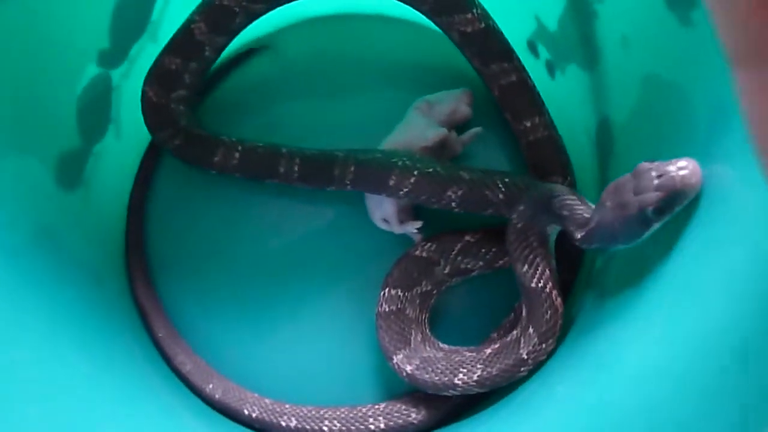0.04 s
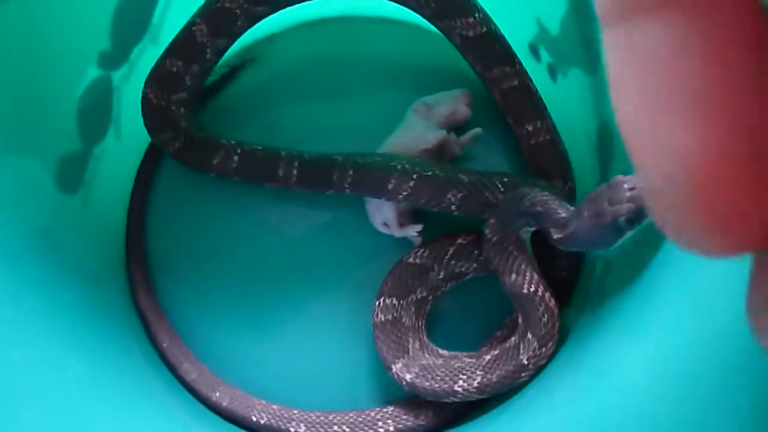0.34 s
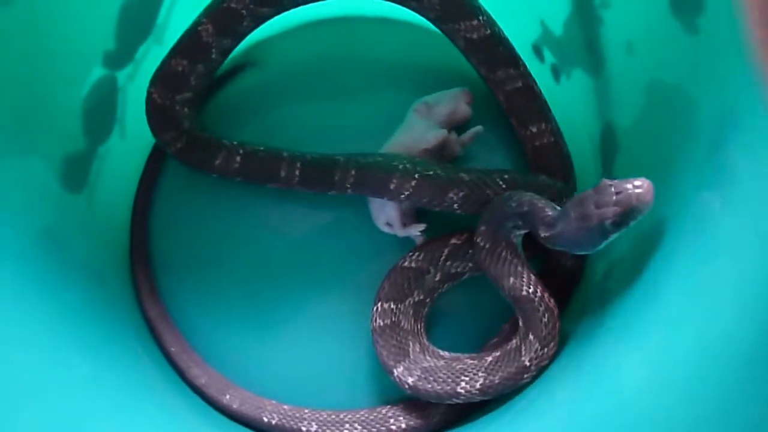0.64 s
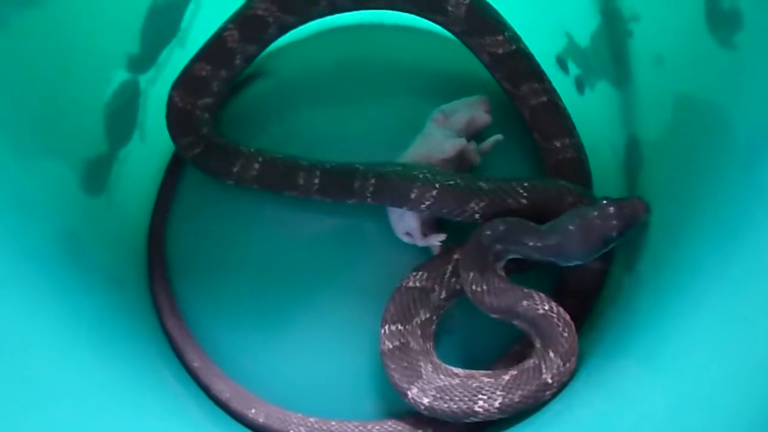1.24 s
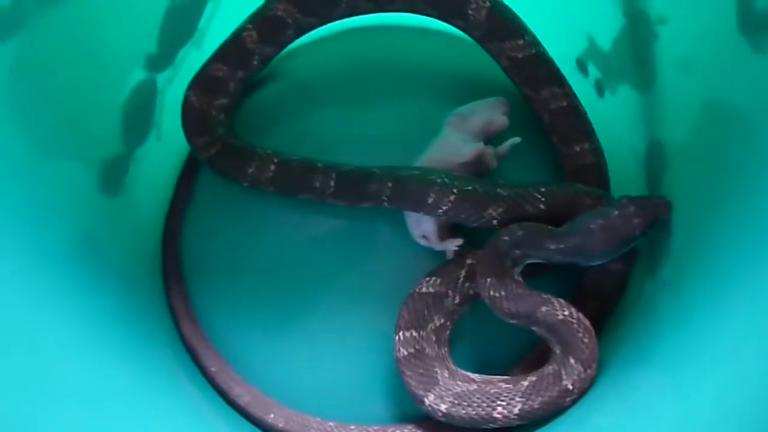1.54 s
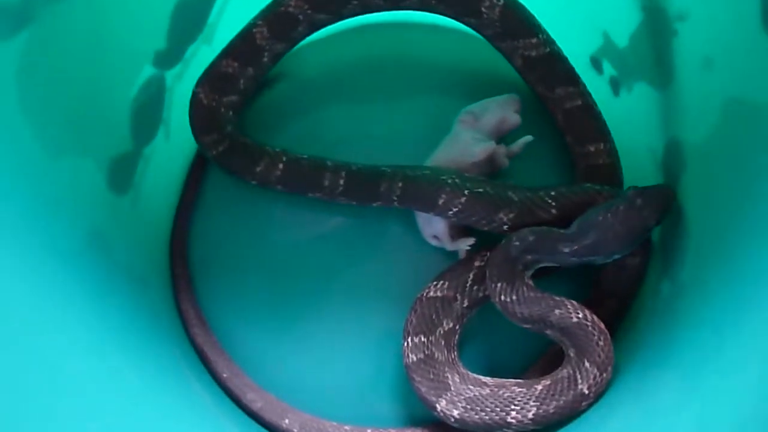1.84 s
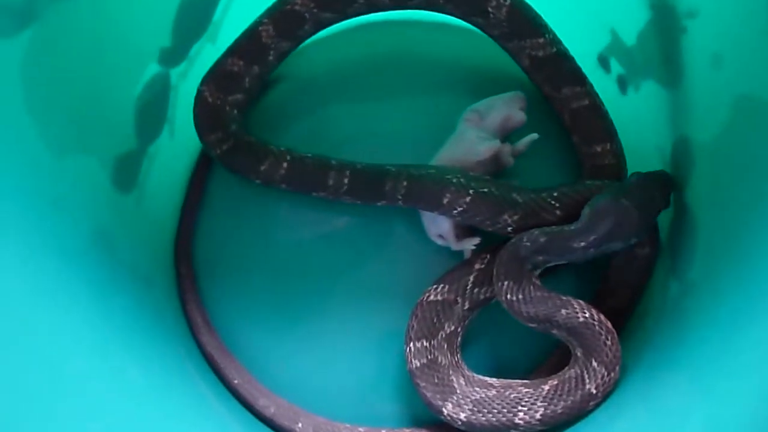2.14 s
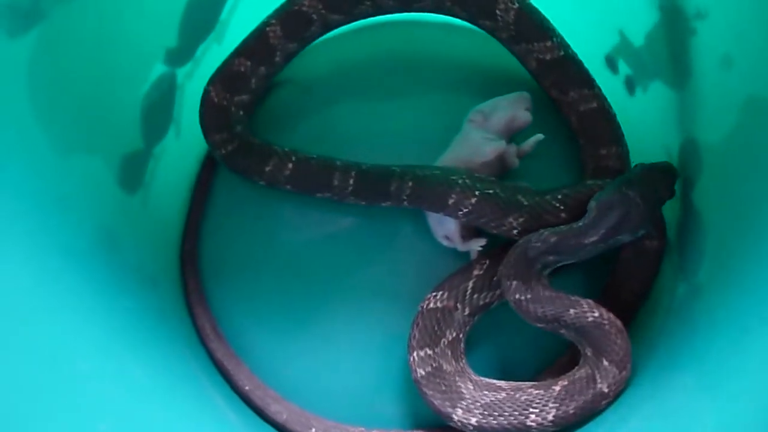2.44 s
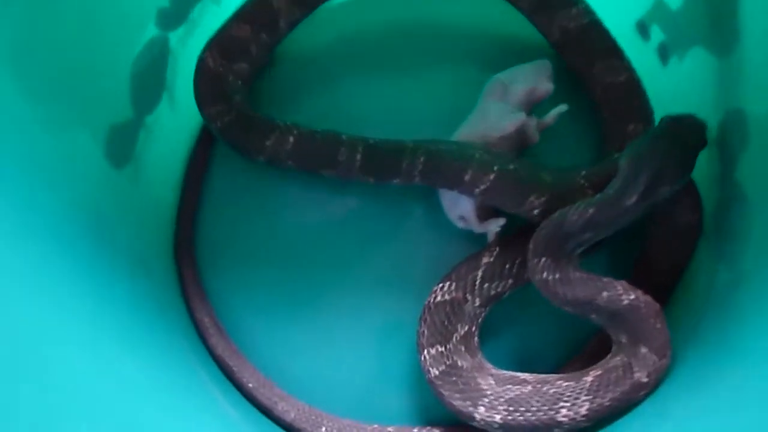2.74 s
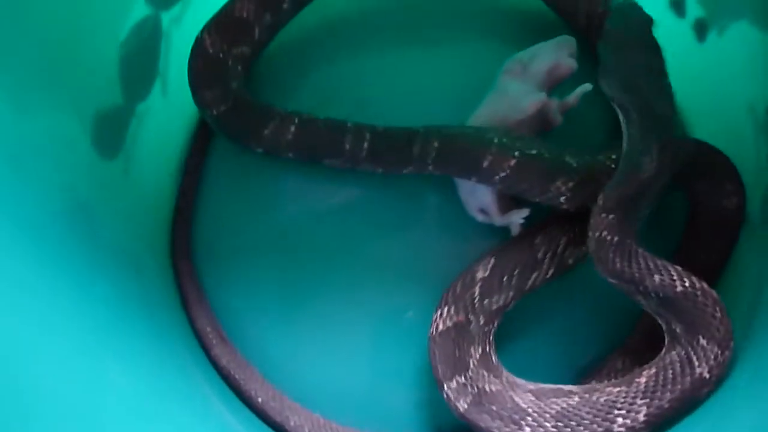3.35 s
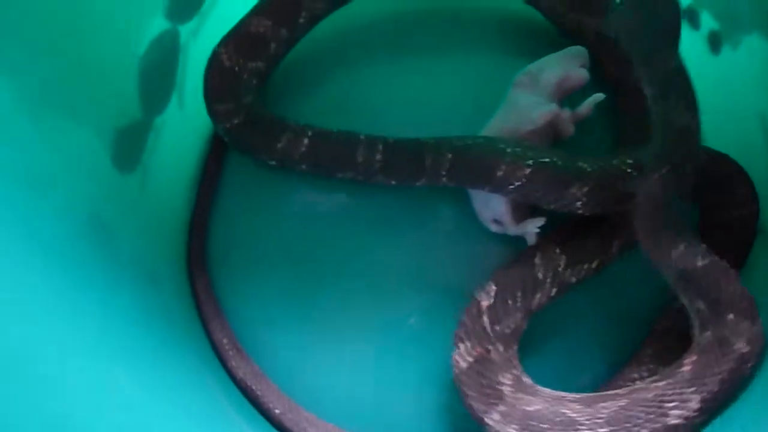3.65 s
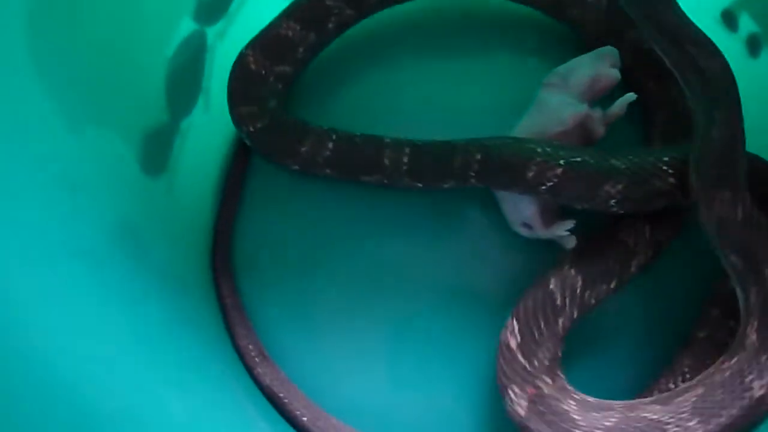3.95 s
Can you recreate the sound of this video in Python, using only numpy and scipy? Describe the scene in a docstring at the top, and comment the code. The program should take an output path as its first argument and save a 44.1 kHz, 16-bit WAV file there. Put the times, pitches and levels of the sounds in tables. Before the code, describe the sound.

A snake's tail rattles against a plastic tub, close by in a quiet room. After a brief burst and a pause comes a fast buzz of ticks, hollow knocks and scraping, which turns raspier and stops, leaving soft hiss.

```python
"""A snake buzzes its tail in a plastic tub, close by, in a quiet room with a mains hum.
A short burst and a pause come first; then the tail beats for three seconds, about 40 times a second.
On each beat the tip ticks on the wall and rebounds, and the flesh thumps the tub into resonance;
between beats the scales scrape to and fro. The tone changes as the tail shifts to new spots, and
a bright rasp joins in its last second. When the tail stops, a soft hiss swells."""
import sys
import numpy as np
from scipy import signal
from scipy.fft import rfft, irfft
from scipy.io import wavfile

SR = 44100
rng = np.random.default_rng(int(sys.argv[2]) if len(sys.argv) > 2 else 0)


def wav_record(signal):
    """Record a signal, one row per channel, as 16-bit PCM in the file named by sys.argv[1]."""
    frames = np.transpose(np.atleast_2d(signal))
    bounded = np.clip(frames, -1, 1)
    # unit amplitude maps onto the largest positive 16-bit level
    quanta = np.round(bounded * 32767).astype(np.int16)
    wavfile.write(sys.argv[1], SR, quanta)


N = 176400
TOP_HZ = 15550

# strength of the ordinary beats (time [s], tick level [dB], thump level [dB])
BEAT_LEVELS = [(.4, -13, -22), (.54, -13, -21), (.62, -12, -19), (.75, -11.5, -20), (.95, -11, -20),
               (1.05, -12.5, -20), (1.22, -13, -17), (1.5, -10.5, -19), (1.85, -14.5, -18), (2.1, -15, -18),
               (2.45, -12, -17), (2.75, -13, -15), (3.28, -12, -16)]
# hollow knocks on the wall (time [s], ring level [dB], pitch [Hz], slap level [dB])
WALL_KNOCKS = [(.008, -20, 580, -26), (.3815, -18, 560, -24), (.4724, -14, 550, -20),
               (.4971, -12.5, 550, -18), (.5222, -16, 560, -13), (.5439, -14, 540, -26),
               (.5878, -15, 550, -25), (.665, -18, 600, -7), (.6781, -17, 580, -24),
               (1.1963, -17, 550, -30), (1.2446, -16, 580, -30), (1.6997, -16, 560, -30),
               (1.7729, -16, 550, -30), (1.9691, -16, 590, -30), (2.0096, -17, 540, -24),
               (2.4165, -15, 660, -30), (2.6441, -15, 570, -30), (2.7721, -15, 540, -30),
               (2.994, -15, 550, -30), (3.0568, -15, 540, -30), (3.1403, -17, 500, -19)]
# modes of the tub, the second the strongest (frequency [Hz], level [dB])
TUB_MODES = [(525, 1), (580, 8.5), (680, -1), (1370, -2)]


def ticks(t, beats, rebound_s=.0037, treble_hz=8000):
    """Inelastic impact: the tip strikes the wall, loses energy and rebounds more weakly."""
    # hard strikes of the tip (time [s], level [dB], extra treble [dB])
    strikes = [(0.0072, -14.0, 8), (0.036, -12.5, 2), (0.3478, -5.5, -4), (0.3621, -12, -1),
               (0.427, -0.5, 2), (0.4508, -7.5, -2), (0.589, -11, 5), (0.6562, -6, 2), (0.8198, -7.5, 0),
               (0.8434, -8.0, 1), (0.9845, -8, 1), (1.0078, -9.5, 3), (1.102, -8, 1), (1.1488, -8.5, 0),
               (1.3614, -7.0, -1), (1.3861, -9.0, 2), (1.434, -9, 1), (1.5286, -5.5, -2), (1.601, -9, 1),
               (1.6743, -7.5, 0), (1.7482, -7.5, 4), (1.8202, -7.5, 1), (2.214, -9.0, 6),
               (2.3908, -5.5, -1), (2.4914, -8.5, 0), (2.5409, -7.0, 3), (2.5663, -2.5, -3),
               (2.7206, -7.5, 0), (2.798, -1.5, -4), (2.8505, -7.0, 0), (2.9513, -8.5, 3), (2.977, -8.0, 4),
               (3.0031, -8.0, 4), (3.056, -9.5, 4), (3.1061, -3.5, 1), (3.1566, -2.0, 4), (3.2086, -5.0, 0)]
    hard_s, hard_db, hard_treble_db = np.array(strikes).T
    soft_s = beats_apart(beats, hard_s)
    times = np.r_[hard_s, soft_s]
    force, lag, size = np.clip(rng.standard_normal((len(times), 3)).T, -1.5, 1.5)
    db = np.r_[hard_db, curve(BEAT_LEVELS, soft_s) + 1.9 * force[len(hard_s):]]
    treble_db = np.r_[hard_treble_db, np.zeros(len(soft_s))]
    rebound_db = np.minimum(db, curve(BEAT_LEVELS, times)) - 10 + 4 * size
    rebounds = impulses(times + rebound_s * (1 + .1 * lag), rebound_db)
    body = wall(t, impulses(times, db) + rebounds)
    snap = wall(t, impulses(times, db + treble_db) + rebounds)
    crossover = signal.butter(2, treble_hz, fs=SR, output="sos")
    return snap + signal.sosfiltfilt(crossover, body - snap)  # zero phase: body below, snap above


def wall(t, hits):
    """Modal excitation: the spot that is struck sets which resonances of the wall sound."""
    # spectrum of a tick on each of four spots (frequency [Hz], level [dB])
    opening = [(400, -12), (1000, -9), (1350, 1), (1600, -7), (2000, 3), (2600, -11), (3300, -4),
               (3800, -14), (4300, 2), (5000, 2.5), (5500, -8), (6800, 6), (7600, -3), (8100, 3),
               (10000, 0), (11300, -8), (12300, 0), (13700, 4), (15500, -9)]
    first = [(400, -10), (650, -5), (1000, -11), (1400, -6), (2000, -9), (2900, -6), (3800, -13),
             (4600, -7), (5500, -14), (6800, -2), (7600, -9), (8100, -2), (10500, -8), (12300, -4),
             (13700, 5.5), (15500, -9)]
    second = [(400, -12), (1650, -13), (2200, 2), (2850, 3), (3400, -3), (3900, -10), (4600, -5),
              (5600, -9), (7100, 3), (8400, -7), (12000, -9), (13200, 4), (14000, 4.5), (15500, -14)]
    third = [(400, -9), (1650, -9), (2100, 3), (3100, 4.5), (3800, -7), (4550, 4), (5050, 0), (6000, 2),
             (9200, -7), (10900, 6), (12400, -1), (13000, 5), (13500, -2), (15500, -7)]
    # share of power as the tail shifts (time [s], opening [0-1], first [0-1], second [0-1], third [0-1])
    shares = [(.46, 1, 0, 0, 0), (.6, 0, 1, 0, 0), (.85, 0, 1, 0, 0), (1.15, 0, 0, 1, 0), (2.3, 0, 0, 1, 0),
              (2.6, 0, 0, 0, 1)]
    crack_gain = undb(-4)
    contact = (hits + crack_gain * crackle(hits, decay_s=.0009)) / np.hypot(1, crack_gain)
    spots = (colour(contact * np.sqrt(curve(shares, t, column)), spectrum)
             for column, spectrum in enumerate((opening, first, second, third), start=1))
    return highpass(sum(spots), hz=494)


def thumps(beats, lag_s=.00066, backswing_s=.015, detune=.03):
    """Impulse excitation: the fleshy tail pushes the tub on each beat, and lightly on the backswing."""
    beats = beats_apart(beats, np.array(WALL_KNOCKS)[:, 0])
    scatter = np.clip(rng.standard_normal((len(beats), 6)).T, -2, 2)
    lag, size, pitch, back_lag, back_size, back_pitch = scatter
    db = curve(BEAT_LEVELS, beats, column=2) - 5
    forward = tub(beats + lag_s + .00061 * lag, db + 2.5 * size, 1 + detune * pitch)
    back = tub(beats + backswing_s + .00199 * back_lag, db - 7 + 3 * back_size, 1 + detune * back_pitch)
    return forward + back


def knocks():
    """Transient and free vibration: a heavier knock gives a dry slap and rings the tub."""
    # spectrum of the slap (frequency [Hz], level [dB])
    spectrum = [(200, -25), (550, -2), (900, 1), (1350, 10), (1900, 8), (2600, -2), (6000, -3),
                (15000, -12)]
    times, ring_db, hz, slap_db = np.array(WALL_KNOCKS).T
    slaps = crackle(impulses(times, slap_db), decay_s=.0012)
    return tub(times, ring_db, hz / TUB_MODES[1][0]) + colour(slaps, spectrum)


def tub(times, db, pitch_ratios):
    """Superposition: each push adds one ring, whose pitch depends on where the tail lands."""
    out = np.zeros(N + SR)
    for onset_s, gain, ratio in zip(times, undb(db), pitch_ratios):
        response, start = ring(ratio), max(int(onset_s * SR), 0)
        out[start:start + len(response)] += gain * response
    return out[:N]


def ring(pitch_ratio=1, t60_s=.03, cutoff_hz=420):
    """Damped resonance: the tub rings briefly in its low modes and radiates little below them."""
    t = np.arange(SR // 8) / SR
    modes = sum(undb(db) * np.sin(2 * np.pi * hz * pitch_ratio * t) for hz, db in TUB_MODES)
    damped = modes * undb(-60 * t / t60_s)
    return unit(highpass(highpass(damped, cutoff_hz), cutoff_hz))


def scrape(t, cycles, swing_db=2, turn_db=.8, flutter_db=1.7):
    """Sliding friction: scales cross the plastic in fine, uneven grains, out and back on each beat."""
    # spectra under light and hard pressure (frequency [Hz], level [dB])
    light_spectrum = [(300, -17), (900, 2), (1400, 7.5), (1900, 7.5), (2900, 4), (4000, 3), (5800, 3.5),
                      (7400, -2.5), (9500, 6.5), (10500, 4), (13100, 6), (14500, 4.5), (15600, -2)]
    hard_spectrum = [(300, -5.5), (600, -1), (1000, -1), (1650, -1.5), (2400, 2), (3000, -4), (4000, 3.5),
                     (4550, 0), (5250, 0.5), (5800, 3.5), (6800, -3.5), (8000, -3), (10000, -1.5),
                     (11000, 0.5), (13500, 0.5), (15600, 0)]
    # envelopes under light and hard pressure (time [s], level [dB])
    light_levels = [(0, -46), (.06, -45), (.11, -52), (.14, -84), (.315, -67), (.328, -58), (.342, -57),
                    (.365, -45), (.65, -43.5), (1.1, -43.5), (1.7, -43.5), (2.1, -42.5), (2.6, -47.5),
                    (3.29, -52), (3.33, -75)]
    hard_levels = [(.3, -64.5), (1.2, -55), (1.7, -46), (2.05, -41.5), (2.4, -41.5), (2.62, -41),
                   (2.95, -37.5), (3.15, -40.5), (3.295, -38.5), (3.32, -55), (3.4, -88)]
    grains = rng.standard_normal((2, N)) * undb(3 * np.minimum(rng.exponential(size=(2, N)), 5))
    angle = 2 * np.pi * (cycles - .65)
    stroke_db = swing_db * np.cos(angle) + turn_db * np.cos(2 * angle)
    grains = grains / grains.std() * undb(stroke_db + flutter_db * wander(rate_hz=170))
    light = grains[0] * undb(curve(light_levels, t))
    hard = grains[1] * undb(curve(hard_levels, t))
    resonance = undb(-16) * through(light + hard, ring())
    return colour(light, light_spectrum) + colour(hard, hard_spectrum) + resonance


def rasp(t, centre_hz=4500, width_hz=400):
    """Narrow-band friction noise: pressed hard, the scales rasp around a wandering frequency."""
    # envelope of the rasp (time [s], level [dB])
    levels = [(2.1, -70), (2.5, -51), (2.75, -46.5), (3.0, -45.5), (3.28, -45), (3.33, -90)]
    lowpass = signal.butter(2, width_hz / 2, fs=SR, output="sos")
    in_phase, quadrature = signal.sosfilt(lowpass, rng.standard_normal((2, N)))
    angle = 2 * np.pi * np.cumsum(centre_hz * (1 + .02 * wander(rate_hz=35))) / SR
    band = in_phase * np.cos(angle) + quadrature * np.sin(angle)
    return band / in_phase.std() * undb(curve(levels, t))


def rumble(t):
    """Forced vibration: the shaken tub gives off low noise."""
    # spectrum of the rumble (frequency [Hz], level [dB])
    spectrum = [(25, -6.5), (65, -5.5), (230, -1.5), (400, -11), (900, -26), (3000, -51)]
    # its envelope (time [s], level [dB])
    levels = [(0, -58), (.12, -67), (.2, -67), (.5, -58.5), (1.5, -63.5), (2.4, -59), (3.25, -57.5),
              (3.35, -64)]
    return colour(rng.standard_normal(N), spectrum) * undb(curve(levels, t))


def background(t, hum_hz=120):
    """Incoherent sources add: steady room noise, mains hum and a late swell of hiss."""
    # spectra of the room noise and the hiss (frequency [Hz], level [dB])
    room_spectrum = [(20, -59), (45, -34), (90, -0.5), (150, 9), (200, 3.5), (350, 4), (540, 4.5),
                     (800, -5.5), (1400, -3), (4000, -14.5), (9000, -29), (15000, -63)]
    hiss_spectrum = [(40, -20), (130, -16.5), (350, -3), (570, -1), (850, -5.5), (2000, -11.5),
                     (6000, -17.5), (15000, -20.5)]
    # envelope of the hiss (time [s], level [dB])
    hiss_levels = [(3.25, -85), (3.35, -58.5), (3.55, -59), (3.85, -56.5), (3.9, -53), (4, -52)]
    hum = undb(-69.5) * np.sqrt(2) * np.sin(2 * np.pi * hum_hz * t)
    hiss = colour(rng.standard_normal(N), hiss_spectrum) * undb(curve(hiss_levels, t))
    return undb(-58.5) * colour(rng.standard_normal(N), room_spectrum) + hum + hiss


def beats_apart(beats, times, gap_s=.01):
    """The beats that coincide with none of the given times."""
    return beats[np.abs(beats[:, None] - times).min(axis=1) > gap_s]


def impulses(times, db):
    """Ideal impacts: one impulse for each contact."""
    out = np.zeros(N)
    np.add.at(out, np.clip((times * SR).astype(int), 0, N - 1), undb(db))
    return out


def crackle(hits, decay_s):
    """Contact noise: a short, decaying puff after each impulse."""
    decay = unit(np.exp(-np.arange(SR // 20) / SR / decay_s))
    return through(hits, decay) * rng.standard_normal(N)


def reflections(decay_s):
    """Diffuse reflection: exponentially decaying noise of unit energy."""
    t = np.arange(SR // 4) / SR
    return unit(rng.standard_normal(len(t)) * np.exp(-t / decay_s))


def wander(rate_hz):
    """Smooth random modulation with a spread near 1."""
    steps = rng.standard_normal(int(rate_hz * N / SR) + 2)
    return 1.2 * np.interp(np.arange(N) * rate_hz / SR, np.arange(len(steps)), steps)


def colour(x, spectrum, size=4096):
    """Minimum-phase filtering at unit energy, from points of (frequency [Hz], level [dB])."""
    hz, db = np.array(spectrum, float).T
    f = np.maximum(np.fft.rfftfreq(size, 1 / SR), 1)
    gain = undb(np.interp(np.log(f), np.log(hz), db)) / (1 + (f / TOP_HZ) ** 40)
    cepstrum = irfft(np.log(gain + 1e-5))
    cepstrum[1:size // 2] *= 2  # folding the cepstrum makes the response causal
    cepstrum[size // 2 + 1:] = 0
    response = irfft(np.exp(rfft(cepstrum)))
    return through(x, unit(response))


def highpass(x, hz):
    """Second-order roll-off of the bass."""
    return signal.sosfilt(signal.butter(2, hz, "high", fs=SR, output="sos"), x)


def through(x, response):
    """Convolution with an impulse response."""
    return signal.fftconvolve(x, response)[:N]


def unit(response):
    """Normalisation to unit energy."""
    return response / np.sqrt(np.sum(response ** 2))


def curve(table, t, column=1):
    """Linear interpolation of one column of a table at times t."""
    rows = np.array(table, float)
    return np.interp(t, rows[:, 0], rows[:, column])


def undb(db):
    """Decibels to amplitude ratio."""
    return 10 ** (np.asarray(db) / 20)


def scene(start_s=.4036, stop_s=3.29, walls_s=.002, room_s=.11):
    """Direct sound and reflections: the tail beats, tub and room answer; the two channels differ only faintly."""
    # beat rate of the tail (time [s], rate [Hz])
    beat_rate = [(0.4, 40.97), (0.56, 44.44), (0.8, 42.55), (1.15, 42.54), (1.45, 41.83), (1.75, 40.99),
                 (2.1, 40.29), (2.35, 40.05), (2.7, 38.9), (3.0, 38.75), (3.15, 39.69), (3.3, 33.49)]
    t = np.arange(N) / SR
    cycles = np.cumsum(curve(beat_rate, t)) / SR
    cycles -= np.interp(start_s, t, cycles)
    whole_cycles = np.arange(np.interp(stop_s, t, cycles))
    beats = np.interp(whole_cycles, cycles, t)
    tail = rumble(t) + ticks(t, beats) + thumps(beats) + knocks() + scrape(t, cycles) + rasp(t)
    enclosure = undb(-10) * reflections(walls_s) + undb(-32.5) * reflections(room_s)
    mid = tail + through(tail, enclosure) + background(t)
    side = undb(-28) * through(mid, reflections(walls_s))
    return np.array([mid + side, mid - side])


def record(dry):
    """Band limiting: the deep bass and the highest treble are cut."""
    steep_lowpass = signal.ellip(10, .2, 70, TOP_HZ, fs=SR, output="sos")
    return signal.sosfilt(steep_lowpass, highpass(dry, hz=40))


dry = scene()
out = record(dry)
wav_record(out)
```